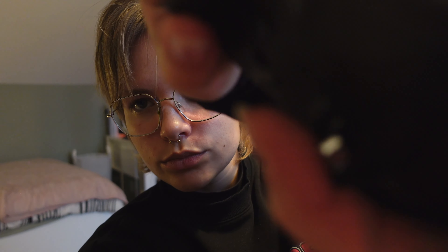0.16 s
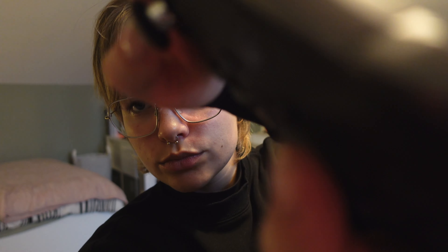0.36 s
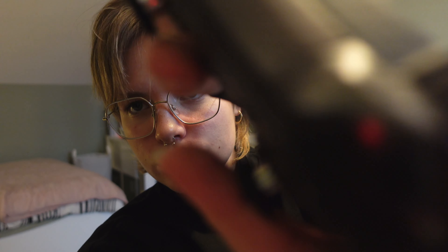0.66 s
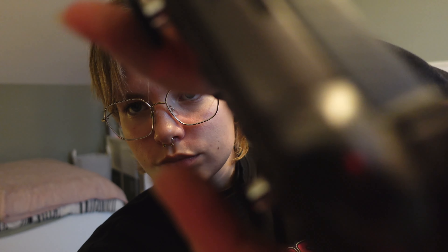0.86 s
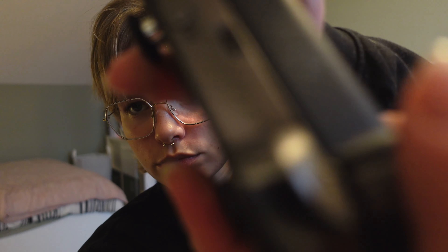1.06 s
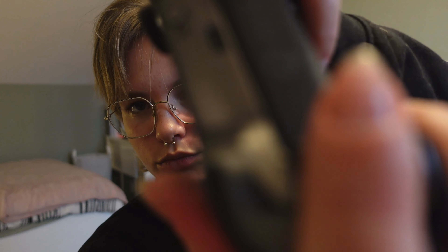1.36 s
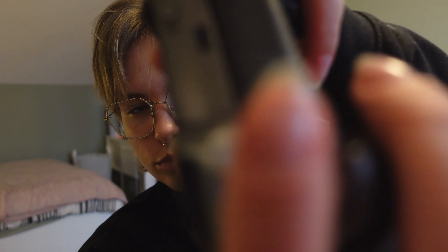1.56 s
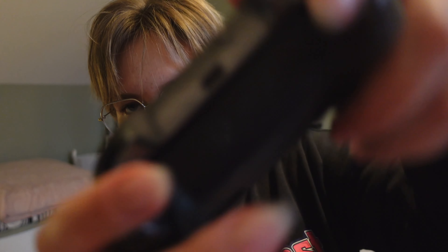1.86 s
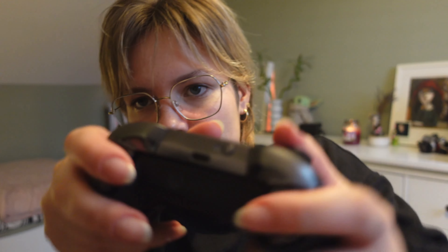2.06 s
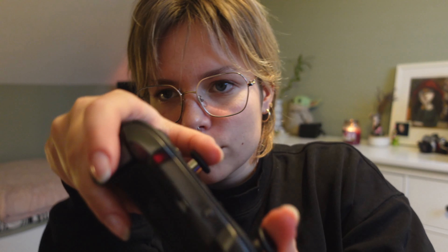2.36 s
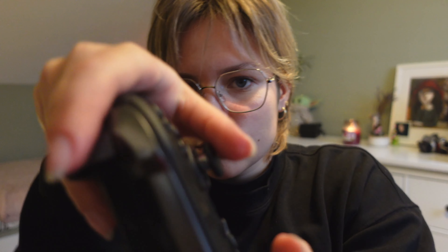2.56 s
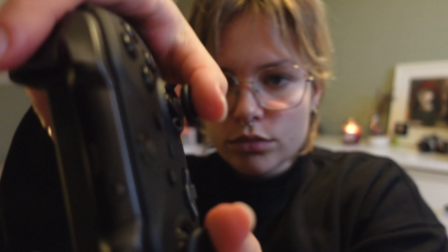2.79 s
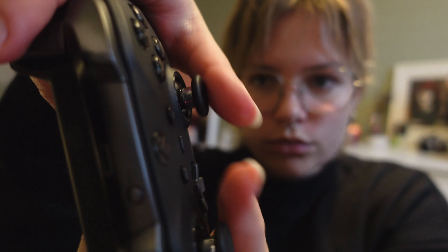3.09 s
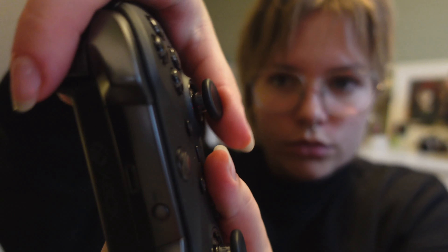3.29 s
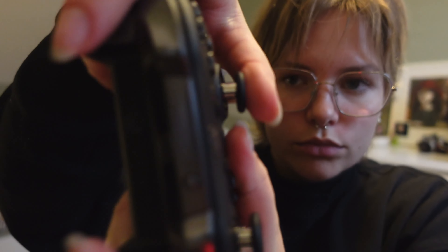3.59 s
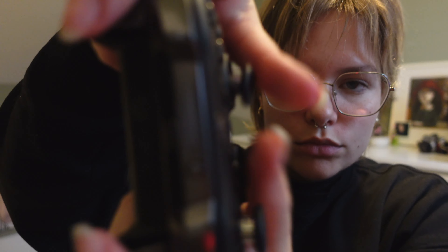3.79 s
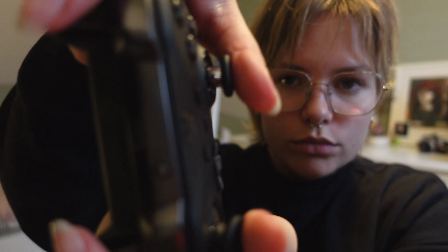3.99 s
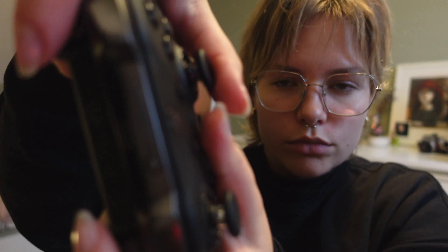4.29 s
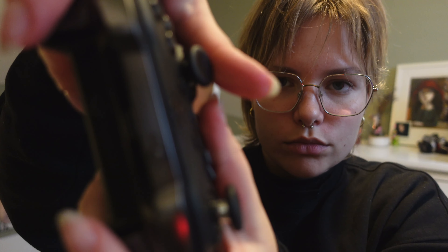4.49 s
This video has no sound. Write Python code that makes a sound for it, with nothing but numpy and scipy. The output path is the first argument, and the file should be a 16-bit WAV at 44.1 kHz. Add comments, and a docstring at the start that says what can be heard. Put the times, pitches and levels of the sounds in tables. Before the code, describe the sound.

Sharp, uneven plastic clicks and clacks of game controller buttons and thumbsticks pressed close to the microphone, over faint room hiss.

```python
"""A plastic game controller is played beside a microphone in a small furnished room.
Over airy hiss and the rub of fingers, a thumbstick clacks back against its stop; like every contact,
it chatters for a millisecond or two and rings the hollow shell, and the room answers. Fingertips tap,
a stick clicks in, nails tick and cushioned buttons knock. At 0.76 s a hard press shoves the body, snaps
a switch and sets a spring sizzling; the switch snaps back. Presses, slides and releases run to 4.6 s."""
import sys
import numpy as np
from scipy import signal
from scipy.fft import rfft, irfft, next_fast_len
from scipy.io import wavfile
from scipy.ndimage import map_coordinates

SR = 44100
rng = np.random.default_rng(int(sys.argv[2]) if len(sys.argv) > 2 else 0)


def persist_wave(psi):
    """Save psi, clipped to +-1, as 16-bit WAV."""
    counts = np.round(np.clip(psi, -1, 1) * 32767).astype(np.int16)
    wavfile.write(sys.argv[1], SR, np.atleast_2d(counts).T)


N = 204668


def amp(db):
    """Decibels to gain."""
    return 10 ** (np.asarray(db) / 20)


def unit(x):
    """Scale to rms 1."""
    return x / np.sqrt(np.mean(x ** 2) + 1e-20)


def along(points, hz):
    """Interpolate (frequency, value) points on a log axis."""
    knots_hz, values = np.transpose(points)
    return np.interp(np.log(hz + 1), np.log(knots_hz + 1), values)


def wobble(rate_hz):
    """Smooth random curve with rate_hz knots a second."""
    knots = rng.standard_normal(int(N * rate_hz / SR) + 4)
    return map_coordinates(knots, [np.arange(N) * rate_hz / SR])


def filtered(x, response):
    """Zero-phase filter of gain response(hz)."""
    length = x.shape[-1]
    size = next_fast_len(2 * length)
    return irfft(rfft(x, size) * response(np.fft.rfftfreq(size, 1 / SR)), size)[..., :length]


def causal(x, points):
    """Minimum-phase filter through (Hz, dB) points: nothing precedes the attack."""
    size = 2 * len(x)
    cepstrum = irfft(np.log(amp(along(points, np.fft.rfftfreq(size, 1 / SR)))))
    cepstrum[1:size // 2] *= 2
    cepstrum[size // 2 + 1:] = 0
    return irfft(rfft(x, size) * np.exp(rfft(cepstrum)))[:len(x)]


def add(track, start_s, sound):
    """Mix a sound into a track."""
    span = track[..., round(start_s * SR):][..., :sound.shape[-1]]
    span += sound[..., :span.shape[-1]]


# Stereo width of diffuse sound: (frequency [Hz], side gain [dB])
WIDTH = [(40, -12), (130, -5), (350, -11), (700, -8), (1400, -9.5), (3000, -14.5), (7000, -14),
         (15000, -39)]


def diffuse(pair):
    """Two unrelated signals as mid and side of a narrow stereo image."""
    side = filtered(pair[1], lambda hz: amp(along(WIDTH, hz)))
    return np.array([pair[0] + side, pair[0] - side])


# Hiss spectrum: (frequency [Hz], relative density [dB])
HISS_SPECTRUM = [(25, -43), (90, -27.5), (150, -19.5), (240, -14), (440, -6.5), (540, -1), (800, -0.5),
                 (1500, -0.5), (2850, 0.5), (3300, -7.5), (4600, -13.5), (7000, -18.5), (11000, -22),
                 (16000, -24.5)]
# Hiss swell: (time [s], relative level [dB])
HISS_SWELL = [(0.0, -51), (0.22, -54.5), (0.71, -50.5), (0.88, -56.5), (1.39, -55.5), (1.67, -52),
              (2.43, -51), (3.11, -53.5), (3.4, -52), (4.04, -51), (4.17, -51.5), (4.64, -54)]
# Humming bands: (centre [Hz], nominal width [Hz], level [dB])
HUM_BANDS = [(373, 25.5, -71), (629, 47, -72), (1084, 86, -64)]


def air(hiss_db=-0.5):
    """Room hiss swells and sinks a little over narrow humming bands."""
    hiss = filtered(rng.standard_normal((2, N)), lambda hz: amp(along(HISS_SPECTRUM, hz)))
    swell_db = np.interp(np.arange(N) / SR, *np.transpose(HISS_SWELL))
    hum = 0
    for centre_hz, width_hz, db in HUM_BANDS:
        noise = rng.standard_normal((2, N))
        band = filtered(noise, lambda hz: 1 / (1 + ((hz - centre_hz) / width_hz * 1.22) ** 2))
        hum += amp(db) * unit(diffuse(band))
    return amp(swell_db + hiss_db) * unit(diffuse(hiss)) + hum


# Skin on plastic: (frequency [Hz], relative density [dB])
SKIN_SPECTRUM = [(200, -40), (700, -22), (2000, 5.5), (4500, -6), (8000, -9.5), (15000, -20.5)]
# Slides between buttons: (mid time [s], length [s], relative level [dB])
SLIDES = [(0.778, 0.14, -52), (1.332, 0.16, -59.5), (1.57, .06, -59), (1.73, 0.29, -54), (2.2, 0.5, -59),
          (2.85, 0.18, -58), (3.325, .2, -58), (3.734, .18, -58), (4.22, 0.39, -57.5), (4.63, 0.086, -49)]


def fingers(rub_db=-1, grain_db=3.5, grip_db=-64.5):
    """Skin catches and slips in fine grains; slides swell above the constant rub of the grip."""
    t = np.arange(N) / SR
    grains = rng.standard_normal((2, N)) * amp(grain_db * wobble(rate_hz=350))
    rub = unit(diffuse(filtered(grains, lambda hz: amp(along(SKIN_SPECTRUM, hz)))))
    sliding = sum(amp(db) * np.exp(-(2 * (t - mid_s) / length_s) ** 2) for mid_s, length_s, db in SLIDES)
    return amp(rub_db) * rub * np.hypot(amp(grip_db), sliding)


def ring(t, hz, t60_s, attack_s):
    """One damped resonance at random phase."""
    return np.sin(2 * np.pi * (hz * t + rng.random())) * amp(-60 * t / t60_s) * (1 - np.exp(-t / attack_s))


# Casing modes: (frequency [Hz], relative level [dB], t60 [s])
CASING_MODES = [(698, -7, 0.037), (1004, -4.5, 0.049), (1360, -4, 0.014), (1639, 10.5, 0.015),
                (2288, -6, 0.03), (2753, -4, .013), (3645, -9.5, 0.015), (4030, -3.5, 0.0073),
                (4740, -12, 0.016), (5730, -1, 0.014), (7030, 9.5, 0.0066), (9280, -2.5, 0.0079),
                (10440, -15, 0.011), (10830, -6.5, 0.0049)]


def casing(t, scatter_db=0.5, detune=0.016, rebound_gain=1.13):
    """A part strikes the casing twice; the grip shifts each mode's pitch and level."""
    modes = 0
    for hz, db, t60_s in CASING_MODES:
        gain = amp(db + rng.normal(0, scatter_db))
        modes += gain * ring(t, hz * rng.normal(1, detune), t60_s, attack_s=0.0001)
    delay_s = rng.uniform(0.000429, 0.000994)
    rebound = np.interp(t - delay_s, t, modes, left=0)
    return unit(modes + rebound_gain * rebound)


# Plastic on plastic: (frequency [Hz], relative density [dB])
CRACK_SPECTRUM = [(100, -41), (400, -23), (650, -2.5), (1700, 5), (4000, -1.5), (7500, 2), (9500, -3),
                  (12500, -10.5), (16000, -16.5)]


def impact(t, shell_hz, button_hz, cavity_hz, cavity_db, button_db, low_cut_hz):
    """Chatter and a buzz of loose parts, with the casing's ring and three local resonances."""
    chatter_s, buzz_db, buzz_t60_s = 0.0017, -13, 0.054
    chatter = rng.standard_normal(len(t)) * np.exp(-(t / chatter_s) ** 4)
    buzz = rng.standard_normal(len(t)) * amp(buzz_db - 60 * t / buzz_t60_s)
    crack = amp(-1) * unit(causal(chatter + buzz, CRACK_SPECTRUM))
    modes = casing(t)
    cavity = amp(cavity_db) * unit(ring(t, cavity_hz, t60_s=0.016, attack_s=0.0018))
    shell = amp(1) * unit(ring(t, shell_hz, t60_s=0.018, attack_s=0.00065))
    button = amp(button_db) * unit(ring(t, button_hz, t60_s=0.0093, attack_s=0.00032))
    # A small shell radiates almost no bass.
    low_cut = signal.butter(4, low_cut_hz, "highpass", fs=SR, output="sos")
    return signal.sosfilt(low_cut, crack + modes + cavity + shell + button)


# Six click bands, hollow, knock, clack, snap, tick, fizz: (edge [Hz])
BAND_EDGES_HZ = [550, 1200, 2200, 3300, 5500, 9000, 15500]


def equalised(click, bands_db, window_s=0.01):
    """Bring each band's energy, averaged over window_s, towards its level."""
    edges_hz = np.array(BAND_EDGES_HZ)
    centres_hz = np.sqrt(edges_hz[1:] * edges_hz[:-1])
    hz = np.fft.rfftfreq(len(click), 1 / SR)
    for _ in range(2):
        energy = np.histogram(hz, edges_hz, weights=abs(rfft(click)) ** 2)[0] * 2 / len(click)
        gain_db = bands_db - 10 * np.log10(energy / (SR * window_s))
        click = causal(click, np.c_[centres_hz, gain_db])
    return click


# Bite, the extra treble of a harder touch: (share per band [ratio])
BITE_SHARE = [0.012, 0, 0.25, 0.26, 0.72, 1]
# Controller position: (time [s], left minus right [dB])
PAN = [(0, -1.3), (.8, -0.5), (1.25, -0.5), (2, -0.5), (3.2, 0), (3.7, 1), (4.64, -0.5)]


# Every *_HITS table: (time [s], strength [dB], bite [dB], shell [Hz], button [Hz])
# Every *_RING table: (cavity [Hz], cavity [dB], button [dB], low cut [Hz], six band offsets [dB])
def contacts(hits, voicing, side_db=-23, broad_send_db=-1, front_send_db=-6):
    """One kind of contact as three tracks: left, right and room send."""
    tracks, t = np.zeros((3, N)), np.arange(1024) / SR
    *ringing, tone_db = voicing
    # Summed over all directions, the resonances partly blur into one broad tap.
    tap = causal(signal.unit_impulse(len(t)), CRACK_SPECTRUM)
    for start_s, strength_db, bite_db, shell_hz, button_hz in hits:
        bands_db = strength_db + np.array(tone_db) + bite_db * np.array(BITE_SHARE)
        front = equalised(impact(t, shell_hz, button_hz, *ringing), bands_db)
        broad = equalised(tap, bands_db)
        send = amp(broad_send_db) * broad + amp(front_send_db) * front
        # Left and right see different faces of the shell.
        side = amp(side_db) * rng.choice([-1, 1]) * broad
        lean_db = np.interp(start_s, *np.transpose(PAN)) / 2
        add(tracks, start_s, np.array([amp(lean_db) * front + side, amp(-lean_db) * front - side, send]))
    return tracks


# Stick returns; columns as at contacts()
CLACK_HITS = [(0.09, -33, -2.5, 1680, 2660), (0.1361, -29.5, -2, 1440, 2740), (1.9937, -31, 1, 1760, 2680),
              (2.2598, -41.5, 0.5, 1900, 2690), (2.2819, -48, -5, 1720, 2650),
              (3.2233, -35.5, -0.5, 1410, 2390), (3.5262, -40, -6, 1780, 2660),
              (3.7128, -33, 4.5, 1520, 2790), (4.0503, -33, 4, 1490, 2750), (4.1083, -30, 0, 1890, 2870),
              (4.598, -39.5, 2, 1550, 2410)]
CLACK_RING = (910, -4, -6, 630, [-6, -5.5, 0.1, -7, -13, -19.8])


def stick_clacks():
    """A stick springs back against its stop."""
    return contacts(CLACK_HITS, CLACK_RING)


# Room decay: (frequency [Hz], t60 [s])
ROOM_DECAY = [(200, 0.77), (1000, 0.19), (3000, 0.19), (7000, 0.28), (15000, 0.11)]
# Room colour: (frequency [Hz], relative level [dB])
ROOM_TONE = [(200, -1), (900, 2.5), (2000, 3), (4000, 1.5), (6500, -1), (9500, 1), (15000, 1)]


def room(send, room_db=-17, build_s=0.0016):
    """Diffuse reflections, drawn anew every third of a second as the controller moves about."""
    wet, step = np.zeros((2, N)), SR // 3
    for start in range(0, N, step):
        hz, t, noise = signal.stft(rng.standard_normal((2, step)), SR, nperseg=256)
        decay = amp(along(ROOM_TONE, hz)[:, None] - 60 * t / along(ROOM_DECAY, hz)[:, None])
        onset = 1 - np.exp(-t / build_s)
        tail = diffuse(signal.istft(noise * decay * onset, SR, nperseg=256)[1])
        tail /= np.linalg.norm(tail[0])
        add(wet, start / SR, signal.fftconvolve(send[None, start:start + step], tail, axes=1))
    return amp(room_db) * wet


# Fingertip landings; columns as at contacts()
TAP_HITS = [(0.3502, -44, 7, 1530, 2520), (0.3885, -59, 17, 1820, 2520), (0.614, -41.5, 1, 1660, 3020),
            (1.6147, -42, -20, 1810, 2330)]
TAP_RING = (900, 1.8, -4, 810, [-0.2, -3.5, -4.5, -8.5, -24, -31])


def fingertip_taps():
    """A soft fingertip lands on the casing."""
    return contacts(TAP_HITS, TAP_RING)


# Stick presses; columns as at contacts()
STICK_HITS = [(0.6255, -50, -8.6, 2090, 3230), (1.9691, -41.3, 1.5, 1510, 4000),
              (2.7808, -36.5, -4.3, 1710, 4060), (3.2896, -37, 0.5, 1920, 3250),
              (3.6523, -37.5, 6.5, 1980, 4130), (3.709, -46, -10, 1740, 4350),
              (3.7342, -37.5, -10, 1740, 4090), (4.226, -36, 2.8, 1800, 4210),
              (4.592, -37.5, 1.5, 2020, 4250)]
STICK_RING = (1084, -10.5, -8, 590, [-2, -1.2, -4, 0, -6, -18.5])


def stick_clicks():
    """A thumbstick is pushed in."""
    return contacts(STICK_HITS, STICK_RING)


# Light touches; columns as at contacts()
TICK_HITS = [(0.6887, -53, 2, 1920, 2610), (0.7077, -41.5, -2.3, 1550, 2760),
             (3.4834, -52.5, 1, 1740, 2690), (3.5085, -53.5, 9.4, 1520, 2300),
             (3.8537, -50.5, 1.5, 1730, 2710), (4.216, -44.5, -9, 1520, 3000),
             (4.2489, -42.2, -4.5, 1950, 2540), (4.263, -43.5, -7, 1940, 3080)]
TICK_RING = (1023, -4, -7, 640, [-2, -1.3, 1.5, -1, -3.5, -6])


def nail_ticks():
    """A nail or a loose part ticks on the plastic."""
    return contacts(TICK_HITS, TICK_RING)


# Cushioned presses; columns as at contacts()
KNOCK_HITS = [(0.723, -46.5, 1.2, 1580, 2280), (0.7388, -47.9, 1, 1850, 2370),
              (1.5188, -37.5, -22, 1730, 2420), (1.5652, -51.5, 5.3, 1680, 2520),
              (1.601, -50.5, -0.3, 1550, 2730), (1.6673, -30.5, 3.5, 1726, 2290),
              (1.7739, -42.5, 8.5, 1630, 2260), (1.8012, -41, 5.5, 1780, 3140), (1.817, -49, 6, 1560, 2280),
              (2.572, -50, 4.5, 1590, 2730), (4.0159, -30, -5.5, 1770, 2430)]
KNOCK_RING = (940, -9, -6.5, 510, [-9.5, 1.3, -5.5, -12.5, -14, -27.5])


def button_knocks():
    """A cushioned button bottoms out and rings mainly the shell."""
    return contacts(KNOCK_HITS, KNOCK_RING)


# Hard presses: (time [s], relative peak [dB])
SHOVES = [(0.764, -42), (0.844, -61), (1.1140, -54), (1.365, -59), (1.9952, -56), (3.322, -66),
          (4.3113, -68)]


def shoves(push_s=0.00057, lean_db=0.6):
    """The shoved body pushes out one soft low thump, slightly louder on the left."""
    t = np.arange(N) / SR
    pulses = sum(amp(db) * np.exp(-((t - peak_s) / push_s) ** 2) for peak_s, db in SHOVES)
    return amp([[lean_db], [-lean_db]]) * pulses


# Switch presses; columns as at contacts()
SNAP_HITS = [(0.7645, -28.5, 1, 1726, 3450), (1.063, -28.5, -1, 1706, 3800),
             (1.3635, -28.5, -2.5, 1730, 3410), (2.061, -32, -0.5, 1790, 3500),
             (2.8815, -30, 0, 1850, 3500), (3.3221, -32, -1.5, 1770, 3590), (4.3097, -30, -2.5, 1710, 4030)]
SNAP_RING = (868, -4, -6, 570, [-5.5, -0.8, -2.5, -0.5, -7, -12])


def switch_snaps():
    """A button is pressed until its switch snaps."""
    return contacts(SNAP_HITS, SNAP_RING)


# Shaken springs and stick stems: (time [s], centre [Hz], level [dB], t60 [s])
SIZZLES = [(0.767, 4170, -51, 0.28), (1.064, 4130, -43, 0.19), (1.065, 9600, -53, 0.21),
           (1.364, 4340, -50, 0.27), (1.996, 9200, -56, .35), (2.783, 6000, -57, 0.46),
           (3.291, 6400, -56, 0.23), (3.654, 6300, -57, 0.47), (4.311, 14000, -60, .25)]


def spring_sizzles(spread=0.16):
    """The many close modes of a shaken spring merge into a fading noise band."""
    track, t = np.zeros(N), np.arange(SR // 5) / SR
    for start_s, centre_hz, db, t60_s in SIZZLES:
        noise = rng.standard_normal(len(t))
        band = filtered(noise, lambda hz: 1 / (1 + ((hz / centre_hz - 1) / spread) ** 4))
        add(track, start_s, amp(db - 60 * t / t60_s) * unit(band))
    return track


# Switch returns; columns as at contacts()
SNAPBACK_HITS = [(0.8434, -28, -1, 1760, 3935), (1.1135, -29.5, 1.8, 1850, 3850)]
SNAPBACK_RING = (857, -4.5, -3, 590, [-4.5, -1.3, -7, 1.1, -2.5, -15])


def switch_snapbacks():
    """The switch snaps back, thinner and brighter."""
    return contacts(SNAPBACK_HITS, SNAPBACK_RING)


# Cushioned returns; columns as at contacts()
RELEASE_HITS = [(1.3148, -52.5, -7, 1830, 2300), (1.7273, -33.5, 1, 1820, 2730),
                (1.7306, -36.5, -18, 1770, 2800), (2.0873, -31, 4.5, 1870, 2450),
                (2.3626, -42, 2, 1680, 2380), (2.3775, -45, 10.8, 1700, 2370),
                (2.3844, -38.5, -1.9, 2060, 2890), (3.3855, -36.8, -8.5, 1910, 2780),
                (4.4135, -35, 1.5, 1820, 2780)]
RELEASE_RING = (877, -5, -7, 630, [-6, -0.1, -3.5, -5, -17.5, -30.5])


def button_releases():
    """A cushioned button is let go and rises into its seat."""
    return contacts(RELEASE_HITS, RELEASE_RING)


def scene():
    """The controller close up, the room behind it."""
    clicks = stick_clacks() + fingertip_taps() + stick_clicks() + nail_ticks()
    clicks += button_knocks() + switch_snaps() + switch_snapbacks() + button_releases()
    near, send = clicks[:2], clicks[2]
    return air() + fingers() + near + room(send) + shoves() + spring_sizzles()


def record(dry):
    """Steep low-pass at the top of the treble."""
    top_hz = 16100
    return filtered(dry, lambda hz: 1 / (1 + (hz / top_hz) ** 160))


dry = scene()
out = record(dry)
persist_wave(out)
```